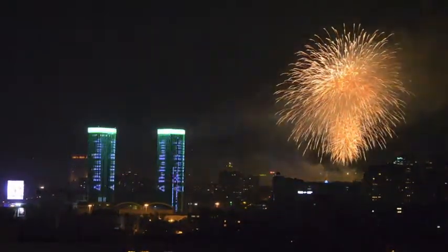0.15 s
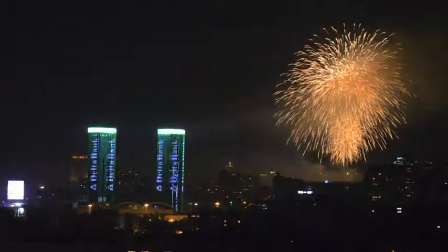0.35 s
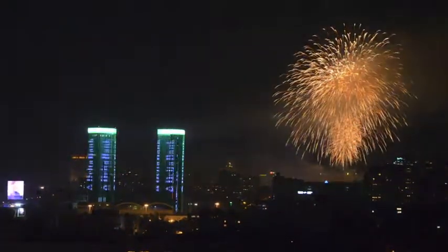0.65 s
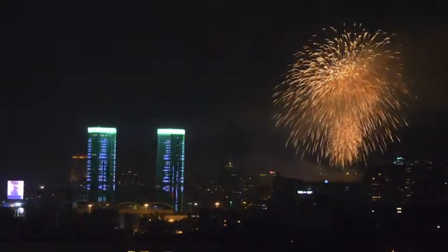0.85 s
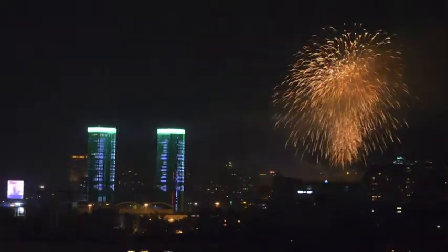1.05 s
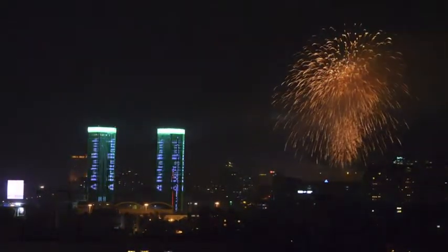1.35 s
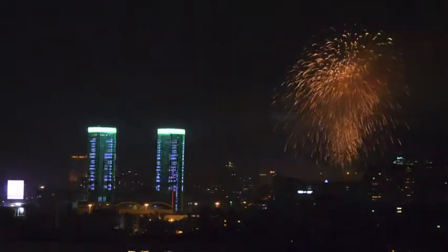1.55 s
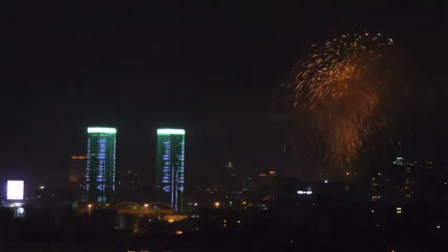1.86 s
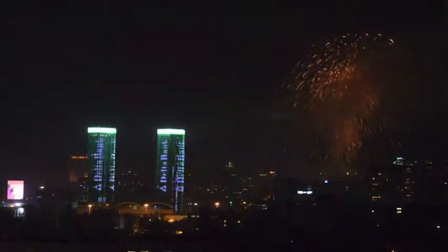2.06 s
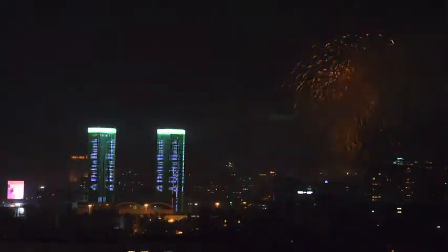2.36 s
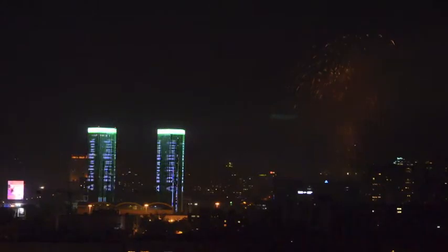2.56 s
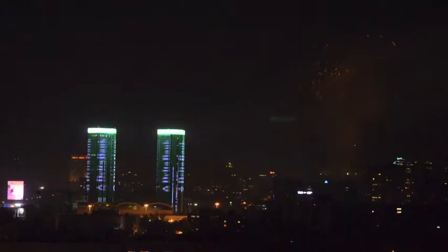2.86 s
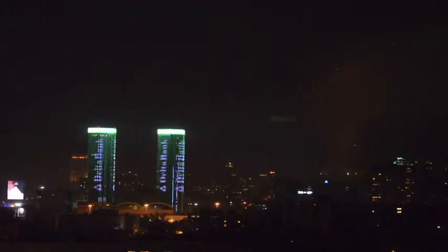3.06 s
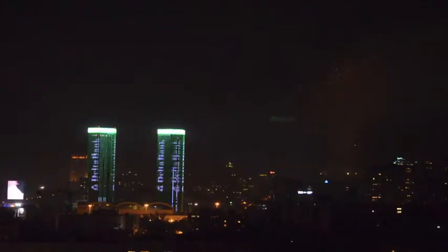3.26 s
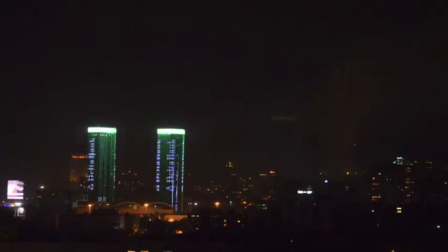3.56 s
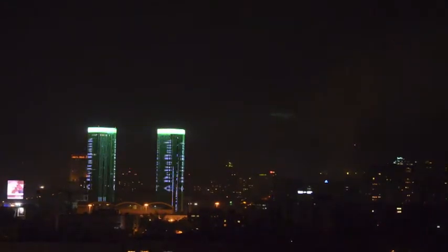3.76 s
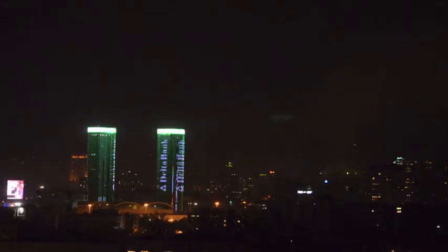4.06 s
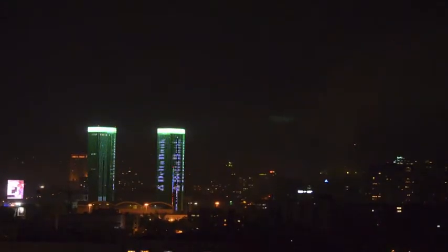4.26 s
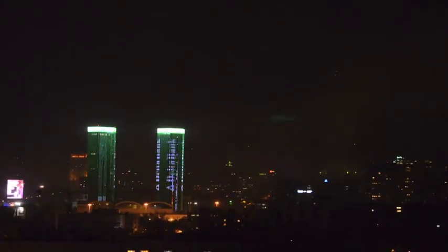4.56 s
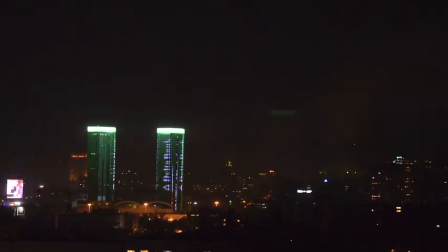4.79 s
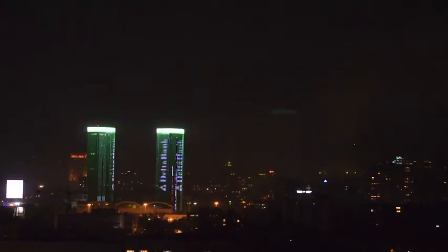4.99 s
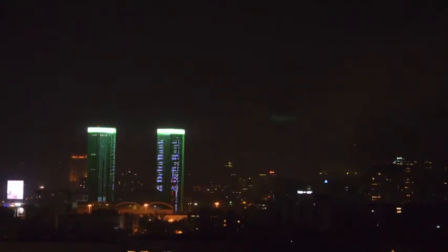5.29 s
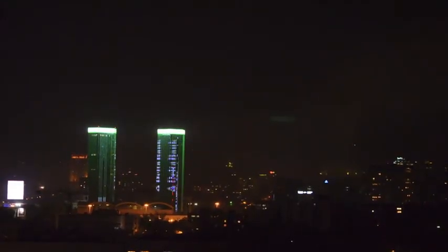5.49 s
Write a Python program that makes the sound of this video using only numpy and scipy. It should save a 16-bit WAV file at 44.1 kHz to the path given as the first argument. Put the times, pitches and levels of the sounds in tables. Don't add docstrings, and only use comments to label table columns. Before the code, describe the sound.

Far firework shells burst at night, heard from a hard-walled balcony. After a second of traffic rumble comes a deep resonant boom, then strong dull cracks in loose pairs, weaker ones between, and a heavy final thud. Each slaps between close walls and rolls briefly off buildings. A tiny tick sounds near the microphone just before the end burst; the loudest fronts clip.

```python
import sys
import numpy as np
from scipy import signal
from scipy.io import wavfile

SR = 44100
rng = np.random.default_rng(int(sys.argv[2]) if len(sys.argv) > 2 else 0)


def wrap_up_sound(samples):
    columns = np.atleast_2d(samples).T
    tamed = np.clip(columns, -1, 1)
    steps = np.round(tamed * 32767).astype(np.int16)
    wavfile.write(sys.argv[1], SR, steps)


def attenuation_scalar(level_db):
    decades = np.asarray(level_db, float) / 20
    return 10 ** decades


N = 248283
FRONT = SR // 100


def at_hz(points, hz):
    table_hz, value = np.transpose(points)
    return np.interp(np.log(hz), np.log(table_hz), value)


def rms_one(x):
    return x / np.sqrt(np.mean(x ** 2) + 1e-20)


def drift(rate_hz):
    r = np.exp(-80 * np.pi * rate_hz / SR)
    white = rng.standard_normal(N // 40 + 2002)
    slow = signal.lfilter([1], [1, -2 * r, r * r], white)[2000:]
    return np.interp(np.arange(N) / 40, np.arange(len(slow)), rms_one(slow))


def ring(x, hz, t60_s):
    r, w = attenuation_scalar(-60 / (t60_s * SR)), 2 * np.pi * hz / SR
    return signal.lfilter([0, np.sin(w)], [1, -2 * r * np.cos(w), r * r], x + 1e-18)


def bands(spectrum):
    edges = 20 * 2 ** np.arange(0, 9.9, 1 / 3)
    edges = edges[(edges > spectrum[0][0]) & (edges < 1.1 * spectrum[-1][0])]
    hz = np.sqrt(edges[1:] * edges[:-1])
    white = rng.standard_normal((2, N + SR))
    noise = []
    for k in range(len(hz)):
        band = signal.butter(3, edges[k:k + 2], "band", fs=SR, output="sos")
        noise.append(signal.sosfilt(band, white[k % 2])[SR:])
    out = np.array(noise) * attenuation_scalar(at_hz(spectrum, hz))[:, None]
    return hz, out / np.std(out.sum(axis=0))


def patchy(spectrum, patchy_db):
    together = drift(1.3)
    return rms_one(sum(band * attenuation_scalar(patchy_db * (together + drift(21))) for band in bands(spectrum)[1]))


def air(x, dull_hz):
    return signal.sosfilt(signal.butter(4, dull_hz, fs=SR, output="sos"), x)


def blast(front_db, dull_hz):
    suction_s, suction_db, push_s = .0011, 6.5, .0022
    t = np.arange(-FRONT, SR // 2) / SR
    pull = -attenuation_scalar(suction_db) * np.exp(np.minimum(t, 0) / suction_s)
    length_s = push_s * (700 / dull_hz) ** .5
    push = (1 - t / (1.3 * length_s)) * np.exp(-np.maximum(t, 0) / length_s)
    return attenuation_scalar(front_db) * air(np.where(t < 0, pull, push), dull_hz)


def slap(x):
    trip_s, trip_db, trip_cut_hz = .0102, -8.5, 900
    ceiling_s, ceiling_db = .0086, -7.5
    lag, dull = round(trip_s * SR), np.exp(-2 * np.pi * trip_cut_hz / SR)
    out, state = x.copy(), [0.]
    for i in range(lag, len(x), lag):
        back, state = signal.lfilter([attenuation_scalar(trip_db) * (1 - dull)], [1, -dull], out[i - lag:i], zi=state)
        out[i:i + lag] += back[:len(x) - i]
    bounce = round(ceiling_s * SR)
    out[bounce:] += attenuation_scalar(ceiling_db) * x[:-bounce]
    return out


# mode_hz, level_db, t60_share [of boom t60]
RECESS_MODES = [(98.5, 0, 1.0), (54, -16, .9), (175, -14, .6), (225, -14, .5), (340, -15, .5)]


def boom(length, dull_hz, boom_db):
    boom_t60_s = .3
    click = air(1. * (np.arange(length) == FRONT), dull_hz)
    out = np.zeros(length)
    for mode_hz, level_db, t60_share in RECESS_MODES:
        chance_db = 1.5 * rng.standard_normal()
        out += attenuation_scalar(boom_db + level_db + chance_db) * ring(click, mode_hz, t60_share * boom_t60_s)
    return out


# band_hz, t60_s
ROLL_DECAY = [(50, 0.6), (150, 0.49), (400, 0.57), (1000, 0.19), (2000, 0.12)]


def roll(hz, echoes, dull_hz, roll_db):
    gather_s, bright_db = .008, 2
    age_s = np.arange(echoes.shape[1]) / SR
    dying = attenuation_scalar(-60 * age_s / at_hz(ROLL_DECAY, hz)[:, None])
    dying *= attenuation_scalar(bright_db * np.log2(dull_hz / 700) * np.log2(hz / 300))[:, None]
    swell = 1 - np.exp(-age_s / gather_s)
    return attenuation_scalar(roll_db) * swell * (dying * echoes).sum(axis=0)


# band_hz, level_db [per Hz]
ROLL_SPECTRUM = [(45, -35.5), (70, -19), (100, -2.5), (160, -3), (220, 0), (290, -7.5), (500, -10),
                 (800, -9.5), (1200, -13.5), (2200, -47.5)]
# start_s, front_db, dull_hz [air cutoff], boom_db, roll_db
BURSTS = [
    (1.0275, -2, 1150, 5.5, -10.5),
    (1.0692, -11, 800, -24, -18),
    (1.9193, 3, 780, -5.5, -11),
    (2.1318, 3, 540, -7.5, -11.5),
    (3.2080, -4.5, 950, -10, -11.5),
    (3.3940, -13, 900, -18, -17),
    (3.8943, -8, 1300, -22, -17),
    (4.1200, -21, 400, -28, -21),
    (5.2195, 3.5, 430, -7, -7.5),
]


def shells():
    out = np.zeros(N + SR)
    hz, echoes = bands(ROLL_SPECTRUM)
    for start_s, front_db, dull_hz, boom_db, roll_db in BURSTS:
        wave = slap(blast(front_db, dull_hz))
        wave += boom(len(wave), dull_hz, boom_db)
        first = round((start_s - 0.33 / dull_hz) * SR) - FRONT
        out[first:first + len(wave)] += wave
        i = round(start_s * SR)
        tail = roll(hz, echoes[:, i:i + SR], dull_hz, roll_db)
        out[i:i + len(tail)] += tail
    return out[:N]


# mode_hz, level_db, t60_s
TICK_MODES = [(2100, -20, 0.0094), (2930, -18, 0.012), (3730, -26, 0.017), (5330, -35.5, 0.0094),
              (6300, -40, 0.0065), (8370, -35, 0.0064), (9600, -39.5, .006), (12400, -27, .004),
              (15300, -42, .005)]


def tick():
    start_s, gap_s = 4.9675, .0005
    click = np.zeros(N)
    click[round(start_s * SR)] = 0.21
    click[round((start_s + gap_s) * SR)] = 1.0
    out = np.zeros(N)
    for k, (mode_hz, level_db, t60_s) in enumerate(TICK_MODES):
        out += (-1) ** k * attenuation_scalar(level_db) * ring(click, mode_hz, t60_s)
    return out


BRAKE_PITCHES = [2720, 3370]


def brake():
    start_s, loudest_db, sag_db = 2.6, -63, -6
    rise_s, hold_s, fall_s = .35, 1.25, .2
    corner_s = start_s + np.cumsum([0, rise_s, hold_s, fall_s])
    level_db = loudest_db + np.interp(np.arange(N) / SR, corner_s, [-18, 0, sag_db, -20])
    whistles = np.zeros(N)
    for pitch_hz, above_db in zip(BRAKE_PITCHES, [6, 0]):
        whistles += attenuation_scalar(above_db) * rms_one(ring(rng.standard_normal(N), pitch_hz, .035))
    return attenuation_scalar(level_db) * whistles


# start_s, roll_db
EARLIER_BURST = (-0.095, -10.5)


def far_echo():
    peak_s = 0.28
    t, power = np.arange(N) / SR, np.zeros(N)
    for start_s, roll_db in [EARLIER_BURST] + [(burst[0], burst[-1]) for burst in BURSTS]:
        age = np.maximum(t - start_s, 0) / peak_s
        power += (attenuation_scalar(roll_db) * age * np.exp(1 - age)) ** 2
    return power


# band_hz, level_db [per Hz]
THROB_SPECTRUM = [(20, -21), (30, -16), (40, -14.5), (52, -7), (70, -16.5), (95, 4), (120, -4),
                  (150, -16.5)]
RUMBLE_SPECTRUM = [(100, -9), (135, -1), (180, -1), (240, -2), (335, -4.5), (450, -11), (600, -23)]
ROAR_SPECTRUM = [(280, -11), (400, -4.5), (520, -5), (770, -3.5), (1000, 0.5), (1300, -9.5), (2000, -20),
                 (2500, -33.5), (3200, -38), (4000, -49.5), (5000, -54), (7000, -64)]
# time_s, level_db
ROAR_LEVEL = [(0, -25.5), (1.5, -26.5), (3.1, -25), (3.8, -26.5), (4.7, -24), (5.63, -25)]


def traffic():
    throb_db, rumble_db = -34.5, -28.5
    far_throb_db, far_rumble_db = -22, -18.5
    far = far_echo()
    throb = np.sqrt(attenuation_scalar(2 * throb_db) + attenuation_scalar(2 * far_throb_db) * far)
    rumble = np.sqrt(attenuation_scalar(2 * rumble_db) + attenuation_scalar(2 * far_rumble_db) * far)
    engines = throb * patchy(THROB_SPECTRUM, patchy_db=-0.4)
    engines += rumble * patchy(RUMBLE_SPECTRUM, patchy_db=1.13)
    time_s, level_db = np.transpose(ROAR_LEVEL)
    roar = attenuation_scalar(np.interp(np.arange(N) / SR, time_s, level_db))
    return engines + roar * patchy(ROAR_SPECTRUM, patchy_db=0.81)


def scene():
    return (shells() + tick() + brake() + traffic())[None]


# band_hz, level_db [per Hz]
HISS_SPECTRUM = [(3000, -12), (4500, 2.5), (6300, 2.5), (8000, 3.5), (10000, 0.5), (13000, -1.5),
                 (16500, -5)]


def hiss():
    return attenuation_scalar(-71.5) * bands(HISS_SPECTRUM)[1].sum(axis=0)


# pitch_hz, level_db [rms]
WHINE_TONES = [(15714, -70.5)]


def whine():
    out, t = np.zeros(N), np.arange(N) / SR
    for pitch_hz, level_db in WHINE_TONES:
        out += np.sqrt(2) * attenuation_scalar(level_db) * np.sin(2 * np.pi * pitch_hz * t + .25 * drift(30))
    return out


def band_limit(x):
    return signal.sosfilt(signal.butter(12, 15850, fs=SR, output="sos"), x)


def record(dry):
    low_cut_hz, offset = 44, .0018
    capsule = signal.sosfilt(signal.butter(3, low_cut_hz, "high", fs=SR, output="sos"), dry)
    mix = np.clip(capsule + offset + hiss() + whine(), -.99, .99)
    return band_limit(mix)


dry = scene()
out = record(dry)
wrap_up_sound(out)
```